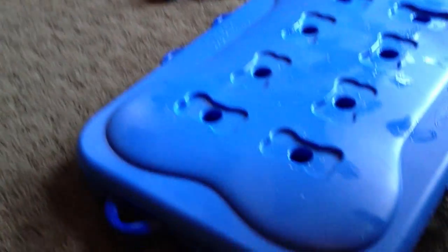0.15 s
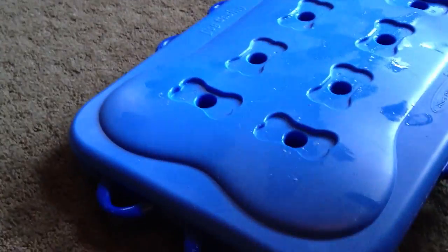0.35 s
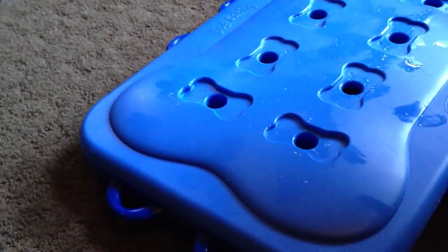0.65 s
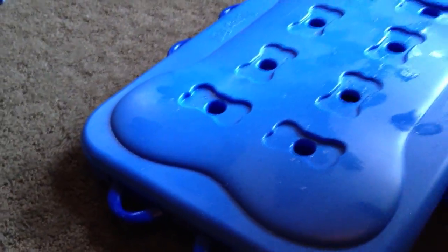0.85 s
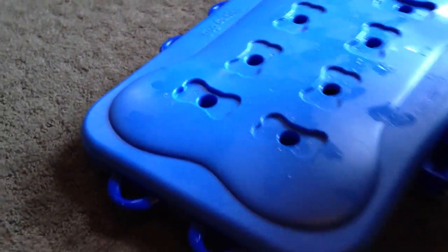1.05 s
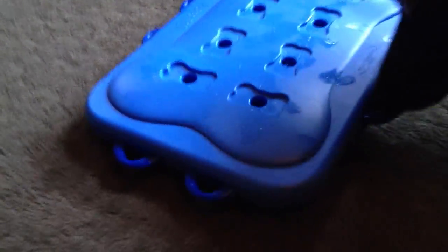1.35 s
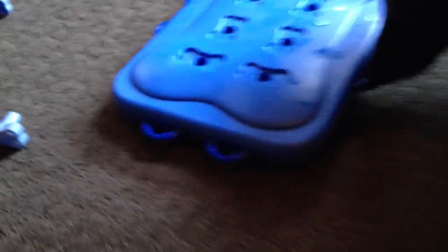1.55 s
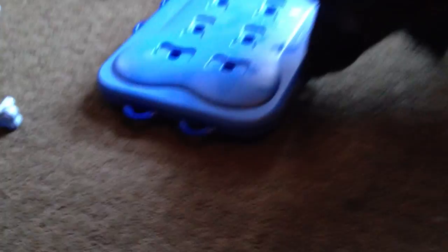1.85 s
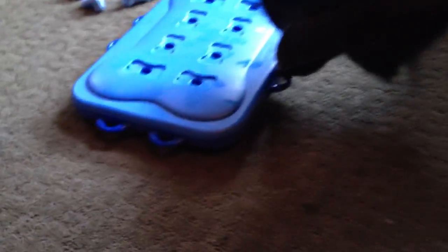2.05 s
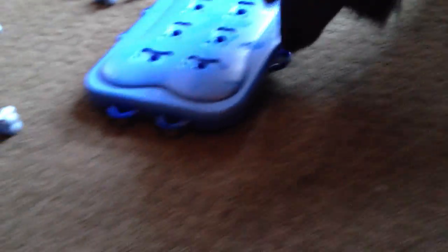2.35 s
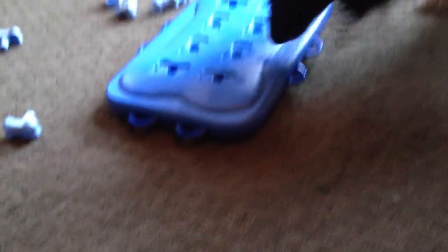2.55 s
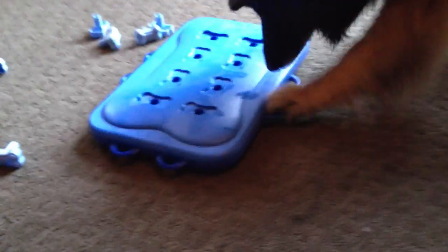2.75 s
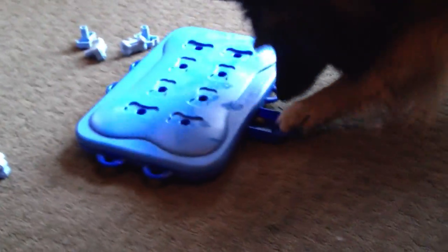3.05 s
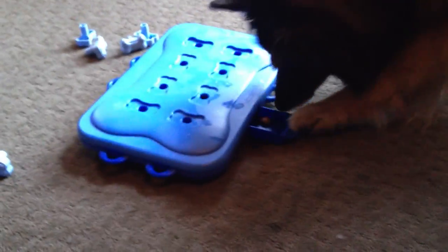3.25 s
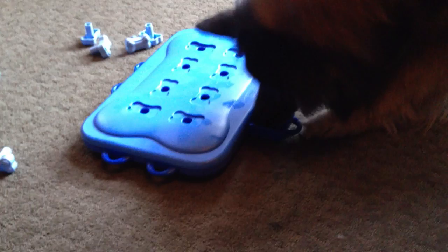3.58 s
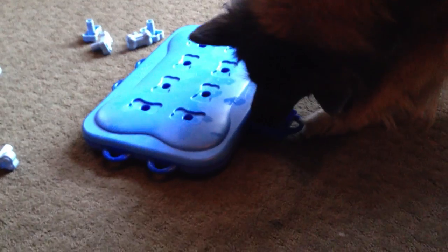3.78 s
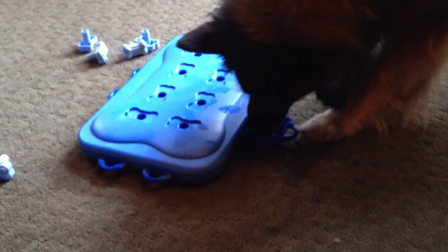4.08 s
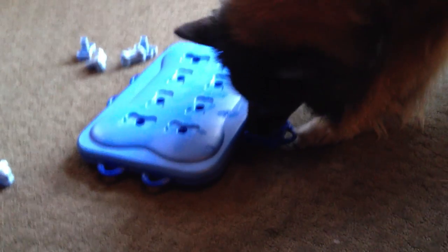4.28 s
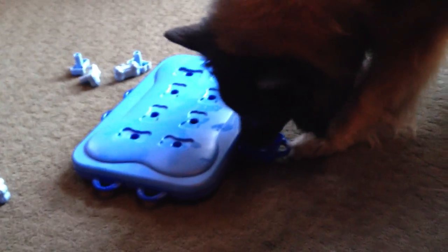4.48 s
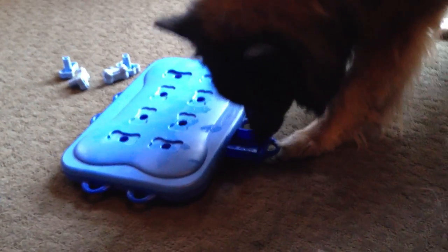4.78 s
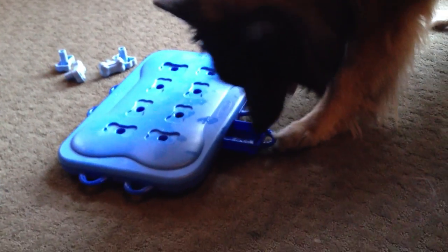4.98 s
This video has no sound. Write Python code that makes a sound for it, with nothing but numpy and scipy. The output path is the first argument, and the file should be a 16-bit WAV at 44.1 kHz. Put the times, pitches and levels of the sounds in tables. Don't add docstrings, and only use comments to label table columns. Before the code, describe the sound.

Close, slightly thin microphone sound: faint hiss and a low hum that fades away, sparse hollow taps on a plastic shell, fur rustle and sniffing air. Midway comes a dense loud burst of cracks and slams, then irregular dry drawer ticks, scrapes and knocks, ending in a bright cluster. Short room reflections on carpet.

```python
import sys
import numpy as np
from scipy import signal
from scipy.fft import rfft, irfft
from scipy.io import wavfile
from scipy.ndimage import uniform_filter1d

SR = 44100
rng = np.random.default_rng(int(sys.argv[2]) if len(sys.argv) > 2 else 0)


def natural_amplitude(level_db):
    exponent = np.asarray(level_db, float) / 20
    return 10 ** exponent


def store_pcm(level_fs):
    pcm = np.round(np.clip(level_fs, -1, 1) * 32767).astype(np.int16)
    wavfile.write(sys.argv[1], SR, np.atleast_2d(pcm).T)


N = 226123
T = np.arange(N) / SR
TICK_TREBLE_DB, CLICK_RISE_S = -21.5, .00095

# pitch in Hz, level in dB, relative ring time.
SHELL = [(202.6, -4, 0.96), (250.5, 4.5, 0.96), (315.7, 5.5, 1), (383, 7.5, 0.75), (461, 5, 0.67),
         (528, 7.5, 0.47), (656, 8, 0.54), (743, 5.5, 0.59), (837, 1, 0.91), (902, 1.5, 0.86),
         (1000, 4, 0.55), (1162, 3, 0.24), (1351, -5, 0.66), (1592, -9.5, 0.98), (1664, -13, 0.37),
         (1867, -23.5, 1), (2306, -5.5, 0.34), (2460, -16, 1)]
# time in seconds, level in dB.
MUZZLE = [(0, -58.5), (.12, -61.5), (.2, -67.5), (.4, -79), (.76, -79.5), (.91, -56.5), (1.35, -55.5),
          (1.59, -63), (1.75, -62), (2.2, -63.5), (2.49, -56), (2.64, -70.5), (3.25, -70), (3.43, -48),
          (3.77, -58), (3.85, -72), (4.9, -77.5), (5.13, -45.5)]


def band(x, hz, width):
    return signal.lfilter(*signal.iirpeak(min(hz, .45 * SR), hz / width, fs=SR), x)


def twice(x, hz, width):
    return band(band(x, hz, 1.46 * width), hz, 1.46 * width)


def unit(x):
    return x / np.sqrt(np.mean(x ** 2))


def add(track, s, sound):
    i = int(s * SR)
    track[i:i + len(sound)] += sound[:N - i]


def fade(t, t60):
    return np.exp(-np.log(1000) * t / np.maximum(t60, .003))


def build_up(t, rise):
    return 1 - np.exp(-(t / rise) ** 2)


def grains(rate, scatter_db):
    hit = rng.random(N) < rate / SR
    size = natural_amplitude(scatter_db * np.minimum(rng.exponential(size=N), 3))
    return unit(hit * rng.standard_normal(N) * size)


def walk(rate):
    k = int(SR / rate)
    held = np.repeat(rng.standard_normal(N // k + 1), k)
    return 1.3 * uniform_filter1d(held, k)[:N]


def swells(rows):
    t = T[::16]
    gain = np.zeros(len(t))
    for s, db, rise, fall in rows:
        away = np.maximum((s - t) / max(rise, .005), (t - s) / max(fall, .005))
        gain += natural_amplitude(db - 20 * away)
    return np.interp(T, t, gain)


def kinds(*tables):
    return sorted(row + traits for table, traits in tables for row in table)


def microphone_hiss():
    # frequency in Hz, density in dB per Hz.
    spectrum = [(25, -22.5), (60, -9), (100, -4), (250, -1), (600, -10), (1200, -15.5), (2500, -19),
                (5000, -19), (10000, -22), (13000, -21.5), (16000, -18)]
    hz, db = np.transpose(spectrum)
    bins = np.fft.rfftfreq(N, 1 / SR) + 1
    colour = natural_amplitude(np.interp(np.log(bins), np.log(hz), db))
    return natural_amplitude(-63.5) * unit(irfft(rfft(rng.standard_normal(N)) * colour, N))


def appliance_hum():
    # time in seconds, level in dB.
    hum_level = [(0, -67), (1.3, -72), (1.9, -78), (2.4, -93), (5.13, -93)]
    level = natural_amplitude(np.interp(T, *np.transpose(hum_level)))
    return np.sqrt(2) * level * np.sin(2 * np.pi * 119 * T)


def paw_fall():
    # level in dB, pitch in Hz, t60 in seconds.
    thump = (-50, 90, 0.093)
    db, hz, t60 = thump
    out, t = np.zeros(N), T[:SR]
    add(out, 2.035, natural_amplitude(db) * np.sin(2 * np.pi * hz * t) * fade(t, t60))
    return out


def room(x):
    t60, dull_hz = .26, 3500
    t = T[:SR // 2]
    noise = rng.standard_normal(len(t))
    low = signal.lfilter(*signal.butter(1, dull_hz, fs=SR), noise)
    tail = low * fade(t, t60) + (noise - low) * fade(t, .49 * t60)
    tail *= build_up(t, .0097)
    return natural_amplitude(-14) * signal.fftconvolve(x, tail / np.sqrt(np.sum(tail ** 2)))[:N]


def nose_air():
    # centre in Hz, width in Hz, level in dB.
    nose = [(6780, 1360, 3.5), (7750, 1100, 4), (9900, 990, -3.5), (11420, 2200, 2), (13500, 3000, -4)]
    # peak in seconds, level in dB, seconds to rise 20 dB, seconds to fall 20 dB.
    sniffs = [(.618, -66.5, 0.7, 0.1), (1.076, -51, 0, -0.1), (1.24, -58, .03, .1), (1.265, -51, .05, .05),
              (1.468, -53, 0.02, 0.05), (1.642, -58.5, 0.03, 0.15), (2.15, -62, 0, 0.17),
              (2.34, -63, 0.3, .3), (2.706, -33.5, .01, 0.1), (2.86, -56, 0.2, 0.15),
              (2.972, -45.5, 0.03, 0.04), (3.114, -60, .02, .12), (3.193, -60, .05, .006),
              (3.285, -59.5, 0.03, .35), (3.92, -54, 0.1, -0.1), (4.404, -70, -0.3, 0.2),
              (4.72, -56, 0.09, 0.17), (4.81, -57, .2, -0.3), (5.104, -44.5, 0.01, -1)]
    noise = rng.standard_normal(N)
    air = sum(natural_amplitude(db + walk(24)) * twice(noise, hz, width) for hz, width, db in nose)
    breath = natural_amplitude(-3) * natural_amplitude(np.interp(T, *np.transpose(MUZZLE)))
    return natural_amplitude(-2.5) * (breath + swells(sniffs)) * unit(air)


def surface_rubbing():
    # centre in Hz, width in Hz, level in dB.
    fur = [(1640, 900, 5), (2400, 390, -3.5), (2850, 600, -0.5), (3570, 520, -2.5), (4140, 350, -2)]
    # centre in Hz, width in Hz, level in dB.
    slot = [(1000, 110, -3.5), (1780, 110, 7), (2400, 110, -8), (2920, 170, 3)]
    # centre in Hz, width in Hz, level in dB.
    loose = [(1350, 260, -4), (1650, 220, -2), (2450, 300, 0), (2750, 250, -3)]
    # peak in seconds, level in dB, seconds to rise 20 dB, seconds to fall 20 dB.
    brushes = [(.618, -81, 1, 5), (1.076, -61, 0.35, -0.17), (1.256, -64.5, 0, 0.26),
               (1.842, -55, 0.33, 0.5), (2.742, -34, 0.0526, 0.07), (2.81, -49, 0.06, 0.17),
               (2.96, -43.5, 0.03, 0.05), (3.12, -60, .03, 0.12), (3.193, -60, .08, .006),
               (3.29, -64, .04, .3), (3.58, -60, 0.17, -0.26), (3.654, -60.5, -0.07, 0.2),
               (3.79, -56.5, -0.08, 0.18), (3.92, -51.5, -0.16, 0.16), (4.02, -63, .02, 0.08),
               (4.21, -54.5, 0.04, 0.2), (4.404, -58.5, -0.02, 0.3), (4.55, -66, 0, 0.5),
               (4.7, -55.5, -0.06, 0.12), (4.8, -52, 0.11, 0.08), (5.1, -41, 0.0261, -0.33)]
    # peak in seconds, level in dB, seconds to rise 20 dB, seconds to fall 20 dB.
    scrapes = [
        (4.67, -65, -0.8, 0.2),
        (4.8, -58.5, -0.1, 0),
    ]
    # peak in seconds, level in dB, seconds to rise 20 dB, seconds to fall 20 dB.
    scuffs = [(1.2, -48, .02, .07), (1.245, -53, .03, .05), (1.78, -56, .15, .4), (3.44, -50, .05, .04),
              (3.495, -43, .03, .05), (4.51, -50, .04, .07)]
    # peak in seconds, level in dB, seconds to rise 20 dB, seconds to fall 20 dB.
    shivers = [(3.91, -56, .03, .1), (4.21, -60, .03, .15), (4.35, -54, .03, .12), (4.41, -57, .05, .06)]
    # peak in seconds, level in dB, seconds to rise 20 dB, seconds to fall 20 dB.
    squeaks = [
        (3.39, -61, .05, .1),
        (3.49, -65, 0.1, 0.08),
        (3.64, -70, 0.05, 0.1),
    ]
    slips = grains(9000, scatter_db=1.5)
    rustle = sum(natural_amplitude(db + 2 * walk(11)) * band(slips, hz, width) for hz, width, db in fur)
    scrape = sum(natural_amplitude(db) * twice(slips, hz, width) for hz, width, db in slot)
    shiver = sum(natural_amplitude(db) * twice(slips, hz, width) for hz, width, db in loose)
    scuff = twice(slips, 1330, 650)
    squeak = twice(slips, 4520, 320)
    lean = natural_amplitude(np.interp(T, *np.transpose(MUZZLE)))
    out = natural_amplitude(-3) * (lean + swells(brushes)) * unit(rustle)
    out += swells(scrapes) * unit(scrape)
    out += swells(scuffs) * unit(scuff)
    out += swells(shivers) * unit(shiver)
    out += swells(squeaks) * unit(squeak)
    return out


def box_dragging():
    # peak in seconds, level in dB, seconds to rise 20 dB, seconds to fall 20 dB.
    slides = [(.05, -65, .8, .05), (.518, -67.5, 0.1, 0.1), (.622, -55, 0.05, 0), (.785, -66.5, 0.1, 0.2),
              (.93, -63, .12, 1), (1.21, -48, 0.01, 0.06), (1.256, -55.5, 0, 0.07), (1.36, -64.5, 0, 0.56),
              (1.636, -75, -1.5, 1), (1.82, -54, 0.09, 0.23), (2.08, -54.5, 0.02, 0.17),
              (2.15, -59, 0.1, -0.15), (2.3, -71, 0.1, 0.3), (2.76, -34.5, 0.0554, 0.12),
              (2.86, -51, 0.06, 0.09), (2.956, -47.5, -0.1, 0.25), (3.43, -53.5, 0, 0.2),
              (3.56, -42, 0.1433, 0.12), (3.654, -49.5, 0.03, 0.06), (3.79, -48, 0.03, 0.11),
              (3.9, -53, 0.16, 0.18), (4.11, -61, -0.05, 0.26), (4.2, -68, -0.7, 0.34),
              (4.33, -67, -1, 0.8), (4.53, -52, 0, 0.1), (4.78, -58, -0.03, 0.1), (5.09, -61, 0.02, -0.2)]
    # peak in seconds, level in dB, seconds to rise 20 dB, seconds to fall 20 dB.
    shoves = [(.52, -56.5, 0.04, .06), (.6, -57, 0.04, 0.13), (.96, -57.5, 0.14, 0.45),
              (1.13, -60.5, 0.1, 0.5), (1.7, -75, -0.2, 0.9), (2.06, -59, 0, 0.25), (2.87, -47, 0.13, 0.07),
              (3.93, -57, 0.3, 0.03), (4.13, -64.5, 0, 0.15), (4.57, -55.5, -0.01, 0)]
    # peak in seconds, level in dB, seconds to rise 20 dB, seconds to fall 20 dB.
    sings = [(.525, -63, -1.4, 0.06), (.61, -57, 0.2, 0.04), (1.13, -70, -0.1, -0.9), (2.965, -49, 0, 0.07),
             (4.565, -52, .08, 0.04)]
    slide_hz, shove_hz, panel_hz = 700, 350, 930
    slips = grains(6000, scatter_db=2.0)
    shaken = [(hz, natural_amplitude(db / 2 + walk(15)) * twice(slips, hz, hz / 7)) for hz, db, _ in SHELL[1:-3]]
    drag = sum(natural_amplitude(-4.75 * np.log2(hz / slide_hz) ** 2) * x for hz, x in shaken)
    rumble = sum(natural_amplitude(-14 * np.log2(hz / shove_hz) ** 2) * x for hz, x in shaken)
    sing = twice(slips, panel_hz, 86)
    return swells(slides) * unit(drag) + swells(shoves) * unit(rumble) + swells(sings) * unit(sing)


def rings():
    # start in seconds, peak in dB, pitch in
    # Hz, seconds to the peak.
    ringing = [(.0985, -46, 1300, .002), (.44, -50, 1300, .003), (2.216, -47, 800, .005),
               (2.228, -46, 1400, .003), (.2465, -31.5, 462, 0.0062), (.246, -34, 707, 0.0046),
               (.247, -33.5, 882, 0.0052), (.255, -42, 320, 0.011), (.307, -48, 595, .006),
               (.44, -41.5, 371, 0.0062), (.4375, -39, 900, .0035), (.436, -43, 592, 0.0044),
               (.48, -52, 420, .008), (.545, -52, 620, .01), (.585, -50.5, 383, 0.0096),
               (1.19, -33, 396, 0.0061), (1.182, -40, 1496, .004), (1.183, -40, 250, .007),
               (1.21, -42, 430, .007), (1.246, -36, 375, .008), (1.293, -52, 350, 0.007),
               (1.362, -34.5, 468, .007), (1.359, -41.5, 1119, 0.0055), (2.226, -40, 913, 0.0055),
               (2.668, -30.5, 254, 0.0064), (2.672, -24.5, 900, .008), (2.682, -31, 624, 0.0057),
               (2.69, -30, 463, 0.0062), (2.705, -35.5, 392, 0.011), (2.746, -25, 872, 0.0041),
               (2.757, -32, 283, 0.0069), (2.775, -30, 860, 0.0057), (2.835, -40, 267, 0.011),
               (2.859, -39, 713, 0.0047), (2.872, -40, 409, .012), (2.942, -44.5, 699, 0.0064),
               (3.013, -43, 925, .005), (3.032, -45, 505, 0.0069), (3.058, -47, 910, .005)]
    # start in seconds, peak in dB, pitch in Hz, seconds to the peak.
    working = [(3.476, -27, 900, 0.005), (3.476, -32.5, 656, .005), (3.487, -40, 265, 0.0046),
               (3.503, -33, 990, .006), (3.539, -36, 673, 0.0045), (3.541, -43, 470, 0.0065),
               (3.547, -42, 325, 0.0067), (3.57, -40, 970, 0.0041), (3.573, -44.5, 288, .008),
               (3.6, -46, 457, 0.0072), (3.652, -44, 260, .007), (3.667, -47, 473, .006),
               (3.786, -48, 260, 0.0085), (3.843, -46, 387, .006), (3.864, -43, 274, 0.0073),
               (3.876, -42, 462, .006), (3.904, -47, 466, 0.0055), (4.125, -57, 400, 0.0088),
               (4.461, -35, 892, 0.0066), (4.46, -42, 250, .012), (4.475, -40, 400, .008),
               (3.578, -41, 400, .008), (4.092, -53, 600, .006), (4.499, -43, 384, .007),
               (4.504, -41.5, 1020, 0.0063), (3.782, -40, 900, .004), (3.881, -46, 2600, .003),
               (3.937, -50, 2550, .004), (4.05, -57, 4700, .003), (4.096, -43, 1000, .004),
               (5.0315, -38, 2300, .002), (4.971, -45, 1080, 0.0036), (5.062, -42.5, 550, 0.0065)]
    out, t = np.zeros(N), T[:SR // 10]
    for s, peak_db, hz, rise in ringing + working:
        grown = t / max(rise, .002)
        swell = grown * np.exp((1 - grown ** 2) / 2)
        add(out, s, natural_amplitude(peak_db) * swell * np.sin(2 * np.pi * hz * t))
    return out


def cracks():
    # start in seconds, peak in dB, centre in Hz, width in Hz.
    contacts = [(1.1824, -24.5, 1150, 850), (1.1826, -33, 12500, 3500), (1.190, -40, 5500, 3000),
                (1.196, -42, 6000, 2500), (2.6656, -21, 3600, 2600), (2.6948, -7.5, 4300, 1900),
                (2.6948, -13, 8500, 2000), (2.69625, -10.5, 4500, 1700), (2.69625, -9, 8500, 1300),
                (2.6965, -15, 10800, 1800), (2.6949, -16, 13600, 2500), (2.6964, -17, 13300, 2000),
                (4.1932, -38, 4000, 2000), (5.0655, -27, 13000, 2000)]
    out = np.zeros(N)
    impulse = 1. * (T[:SR // 50] == 0)
    for s, peak_db, hz, width in contacts:
        swing = twice(impulse, hz, max(width, 300))
        add(out, s, natural_amplitude(peak_db) * swing / np.abs(swing).max())
    return out


def clicks(hits):
    # centre in Hz, width in Hz, level in dB.
    drawer = [(1930, 710, 1.5), (2550, 290, 4.5), (3455, 990, 4), (4220, 1160, 0.5), (5480, 620, -0.5),
              (6590, 940, 4), (7680, 400, -12), (10370, 1650, 0), (11840, 1200, -1.5), (14300, 2300, -32)]
    lead_s = .0007
    out, t = np.zeros(N), T[:SR // 8]
    for s, peak_db, pitch_hz, t60, treble_db, rise in hits:
        decay = fade(t, t60) + natural_amplitude(-12.5) * fade(t, 5 * t60)
        burst = rng.standard_normal(len(t)) * decay * build_up(t, max(rise, 1e-4))
        burst[int(rise * SR)] += 3.5 * (rise < .003)
        skid = rise > .003
        click = natural_amplitude(9.0 + 3.1 * skid) * twice(burst, pitch_hz, pitch_hz / (6 + 12 * skid))
        click = click + natural_amplitude(-3.5) * (band(burst, 2630, 56) + band(burst, 1734, 68))
        for hz, width, db in drawer:
            mode_db = db + (hz > 5500) * (treble_db + 12.0)
            click = click + natural_amplitude(mode_db) * twice(burst, hz, width)
        add(out, s - lead_s, natural_amplitude(peak_db) * click / np.abs(click).max())
    return out


def drawer_rebounds():
    # start in seconds, peak in dB, strongest pitch in Hz, t60 in seconds.
    bounces = [(2.712, -35, 3200, .01), (4.0885, -52, 3000, 0.01), (5.060, -38, 3000, .015),
               (5.0672, -23, 4700, .012), (3.405, -42, 1400, .015), (3.5085, -33, 1750, 0.018),
               (3.549, -37, 1790, 0.012), (4.3215, -45, 2500, .01), (4.3455, -36, 2490, 0.017),
               (4.406, -45, 1700, 0.018)]
    # start in seconds, peak in dB,
    # strongest pitch in Hz, t60 in seconds, treble share in dB, rise in seconds.
    slam_back = [
        (2.6965, -14, 5700, .012, -13, .0006),
    ]
    return clicks(kinds((bounces, (TICK_TREBLE_DB, CLICK_RISE_S)), (slam_back, ())))


def claws_and_drawers():
    # start in seconds, peak in dB, strongest pitch in Hz, t60 in seconds.
    snaps = [(.0984, -54, 1600, 0.014), (.2472, -34, 2580, 0.014), (1.0644, -42, 6850, .016),
             (1.1822, -34, 5900, 0.015), (1.3578, -45, 2180, 0.021), (1.4974, -43.5, 2030, 0.013),
             (2.1036, -41, 2600, 0.0068), (2.6656, -17, 8600, 0.018), (2.6774, -23, 2540, 0.0037),
             (2.7064, -13.5, 7200, 0.007), (2.7496, -22, 4290, 0.014), (2.7901, -27, 7000, 0.014),
             (3.4635, -21, 2870, 0.018), (3.4734, -23.5, 2330, 0.0072), (3.4804, -29, 1980, 0.061),
             (4.2847, -49, 2650, .016), (4.4585, -33, 2110, 0.013), (4.4684, -44, 3810, 0.019),
             (4.4857, -36, 1940, .027), (4.5321, -35.5, 4440, 0.014), (4.5444, -55, 2400, .016),
             (5.0364, -40, 3300, 0.02), (5.0635, -23, 3300, 0.021), (5.0744, -29, 6500, 0.03),
             (5.1024, -42, 4770, .018)]
    # start in seconds, peak in dB, strongest pitch in Hz, t60 in seconds.
    ticks = [(1.1294, -49.5, 1990, 0.014), (2.8315, -36.5, 4160, 0.021), (2.9894, -34, 2830, .011),
             (3.4394, -35, 1950, 0.067), (3.5244, -30, 1940, 0.022), (3.6431, -37, 2850, 0.01),
             (3.6504, -35, 2650, 0.011), (3.7284, -46, 3670, .016), (3.7748, -37.5, 3840, 0.013),
             (3.8501, -45, 2500, .013), (3.8671, -22, 2890, 0.014), (3.8724, -33, 3600, 0.012),
             (3.894, -27, 3560, 0.0047), (3.9004, -31, 4400, 0.016), (4.0163, -46.5, 2700, .018),
             (4.1584, -39, 4800, 0.011), (4.1844, -35, 2870, 0.0068), (4.1924, -35, 3900, 0.035),
             (4.3256, -27, 2950, 0.036), (4.3374, -25, 2720, 0.0085), (4.4019, -43, 2400, 0.021),
             (5.0135, -39, 6000, 0.03), (5.032, -31, 2400, .012)]
    # start in seconds, peak in dB,
    # strongest pitch in Hz, t60 in seconds, treble share in dB, rise in seconds.
    slams = [
        (2.6948, -13, 8300, 0.012, -12, .0008),
    ]
    # start in seconds, peak in dB,
    # strongest pitch in Hz, t60 in seconds, treble share in dB, rise in seconds.
    skids = [
        (0.595, -52, 4460, 0.026, -20, 0.016),
        (2.943, -32.5, 4500, 0.044, -16, 0.0034),
    ]
    snap_treble_db = -10.5
    hits = kinds((snaps, (snap_treble_db, CLICK_RISE_S)), (ticks, (TICK_TREBLE_DB, CLICK_RISE_S)), (slams, ()))
    return clicks(hits + skids)


def knocks():
    # start in seconds, peak in dB, strongest pitch in Hz, ring t60 in seconds.
    taps = [(.0975, -31.5, 800, 0.021), (.2464, -19.5, 461, .047), (1.1814, -22.5, 653, 0.1),
            (1.496, -49, 1290, 0.063), (2.1028, -25, 517, 0.046), (2.119, -37, 610, 0.11),
            (4.326, -46.5, 1350, 0.12)]
    # start in seconds, peak in dB, strongest pitch in Hz, ring t60 in seconds.
    pats = [
        (1.3578, -28, 650, 0.055),
    ]
    # start in seconds, peak in dB, strongest pitch in Hz, ring t60 in seconds.
    raps = [(2.6685, -15, 595, 0.067), (2.7458, -15.5, 656, 0.06), (3.384, -43, 650, 0.051),
            (3.473, -24, 920, 0.081), (3.505, -27, 953, 0.26), (3.773, -33.5, 837, 0.16),
            (4.97, -47, 1150, 0.1), (5.063, -38, 550, 0.15)]
    # start in seconds, peak in dB, strongest pitch in Hz, ring t60 in seconds.
    bangs = [(1.064, -45.5, 313, 0.048), (1.124, -42.5, 205, 0.071), (2.681, -21.5, 934, 0.065),
             (2.694, -24, 1000, 0.17), (2.989, -35, 674, 0.11), (3.438, -44, 466, 0.12),
             (3.524, -28, 865, 0.087), (3.547, -32, 844, 0.052), (3.649, -33, 930, 0.055),
             (3.848, -33, 973, 0.16), (3.896, -40, 850, 0.035), (4.0895, -42, 1000, 0.09),
             (4.4595, -23.5, 937, 0.092), (4.483, -29, 850, 0.11), (5.032, -48, 245, 0.12)]
    # start in seconds, peak in dB, strongest pitch in Hz, ring t60 in seconds.
    bumps = [(.309, -43, 736, 0.11), (.437, -38.5, 594, 0.025), (1.242, -35.5, 700, 0.12),
             (2.08, -40, 580, 0.06), (2.226, -34, 500, .05), (2.249, -45.5, 490, 0.13),
             (2.324, -46.5, 643, .064), (2.666, -22, 1020, 0.029), (2.724, -29, 890, 0.078),
             (2.764, -34, 610, 0.072), (2.792, -26.5, 947, 0.31), (2.832, -30, 693, 0.081),
             (2.961, -31, 975, 0.044), (3.013, -36.5, 520, 0.15), (3.064, -53, 634, .08),
             (3.571, -35, 960, 0.05), (3.867, -34.5, 930, 0.14), (4.554, -44, 870, .067),
             (4.89, -57, 253, 0.053)]
    # start in seconds, peak in dB, strongest pitch in Hz, ring t60 in seconds.
    touches = [
        (.238, -36, 800, 0.04),
    ]
    # deep share in dB, hard share in dB,
    # contact build-up in seconds, first push in dB.
    tap, bang = (-27, -5, -0.07, -8.5), (-10.5, -5.5, .0014, -18)
    bump, touch = (-14.5, -26, .0018, -36), (-19, -11, -0.1, -28)
    # deep share in dB, hard share in dB, build-up in seconds, first push in dB.
    rap = (-25, -3.5, .002, -29.5)
    # deep share in dB, hard share in dB, build-up in seconds, first push in dB.
    pat = (-20, -14, .0007, -14)
    lag_s = .001
    push_hz = 1300
    spot_db, spot_ring = 9, .53
    small_ring = .74
    out, t = np.zeros(N), T[:SR // 3]
    hz, db, ring = (c[:, None] for c in np.transpose(SHELL))
    blows = kinds((taps, tap), (pats, pat), (raps, rap), (bangs, bang), (bumps, bump), (touches, touch))
    for s, peak_db, pitch_hz, t60, deep_db, hard_db, contact, push_db in blows:
        size, bend = rng.standard_normal((2, len(SHELL), 1))
        octaves = np.log2(hz / pitch_hz)
        share_db = db + 8 * np.exp(-(octaves / .22) ** 2) + 2 * np.abs(size)
        share_db += (hz < 430) * (deep_db + 7.0) + (hz > 1100) * (hard_db + 13.5)
        decay = fade(t, t60 * ring * np.where(hz > 1100, small_ring, 1))
        swing = np.sin(2 * np.pi * hz * (1 + 0.021 * bend) * t)
        modes = np.sign(size) * natural_amplitude(share_db) * swing * decay
        spot = natural_amplitude(spot_db) * np.sin(2 * np.pi * pitch_hz * t) * fade(t, t60 * spot_ring)
        blow = (modes.sum(axis=0) + spot) * build_up(t, max(contact, 1e-4))
        push = natural_amplitude(push_db) * np.sin(2 * np.pi * push_hz * t) * (t < 1 / push_hz)
        add(out, s + lag_s, natural_amplitude(peak_db) * (blow / np.abs(blow).max() + push))
    return out


def scene():
    background = microphone_hiss() + appliance_hum() + paw_fall()
    rubbing = nose_air() + surface_rubbing() + box_dragging()
    shell = signal.lfilter(*signal.butter(2, 170, "high", fs=SR), knocks())
    box = shell + claws_and_drawers() + rings() + cracks()
    return (background + rubbing + drawer_rebounds() + box + room(box))[None]


def low_pass(x):
    return signal.sosfilt(signal.butter(12, 16410, fs=SR, output="sos"), x)


def record(dry):
    heard = signal.lfilter(*signal.butter(2, 110, "high", fs=SR), dry)
    heard = heard + .08 * heard ** 2
    heard = signal.sosfilt(signal.ellip(7, .3, 34, 15250, fs=SR, output="sos"), heard)
    return low_pass(heard)


dry = scene()
out = record(dry)
store_pcm(out)
```